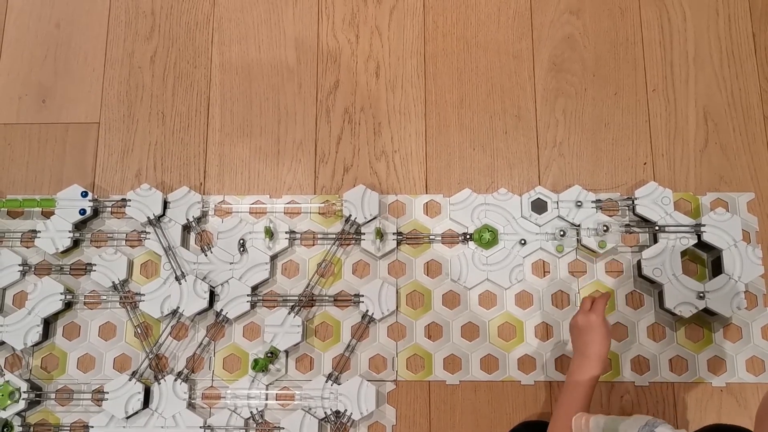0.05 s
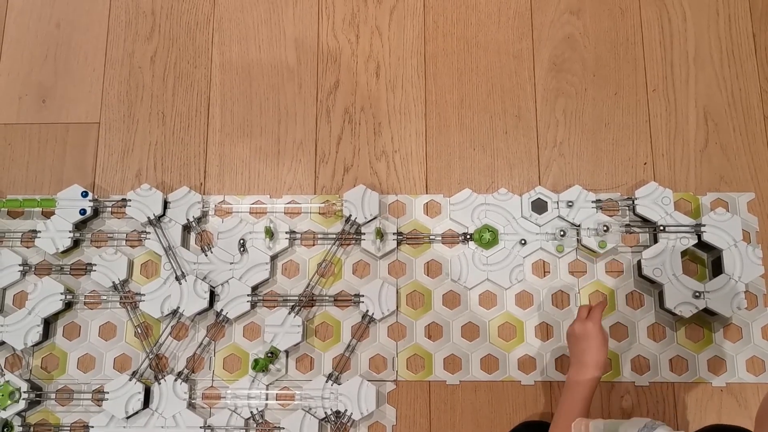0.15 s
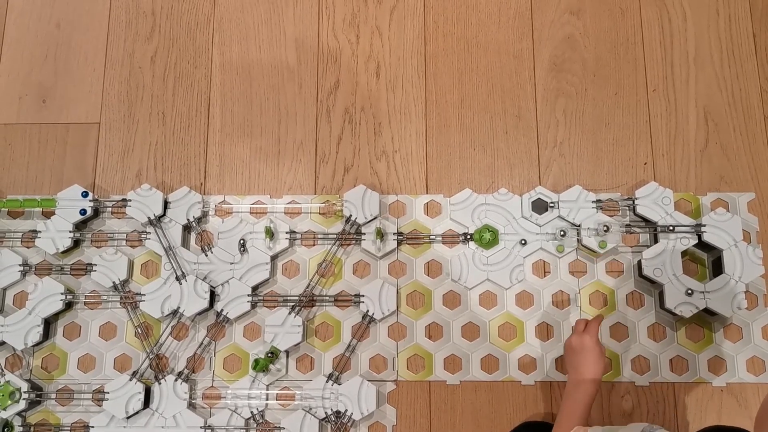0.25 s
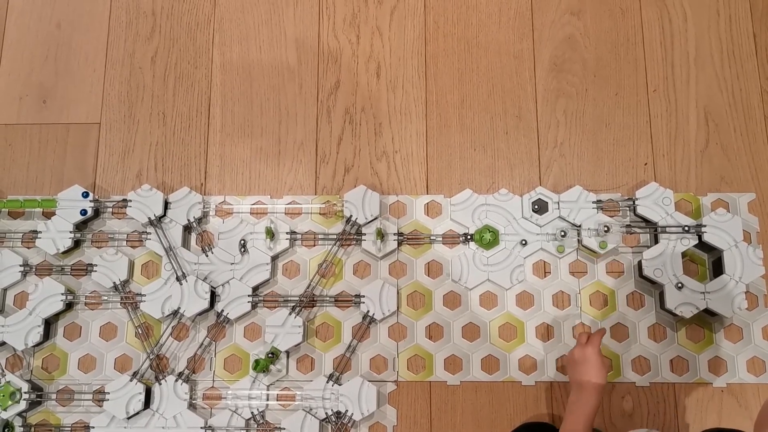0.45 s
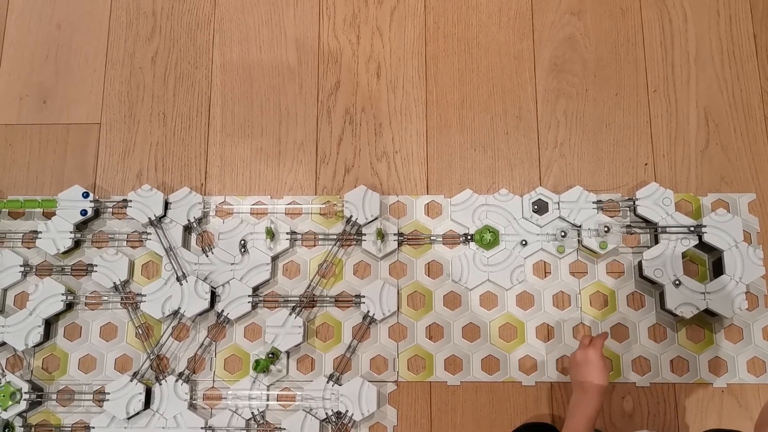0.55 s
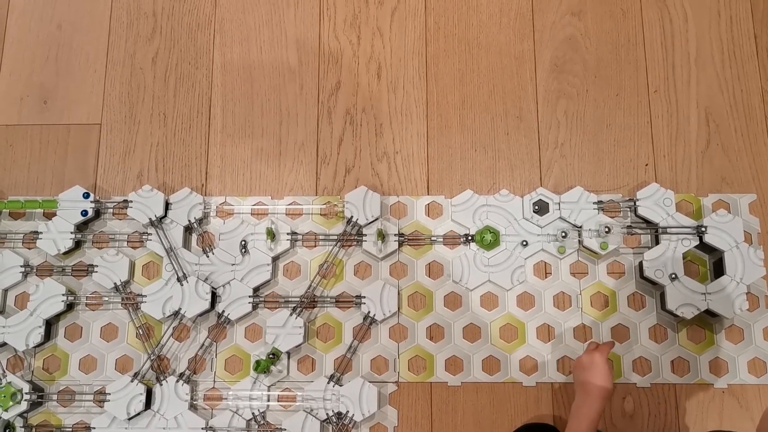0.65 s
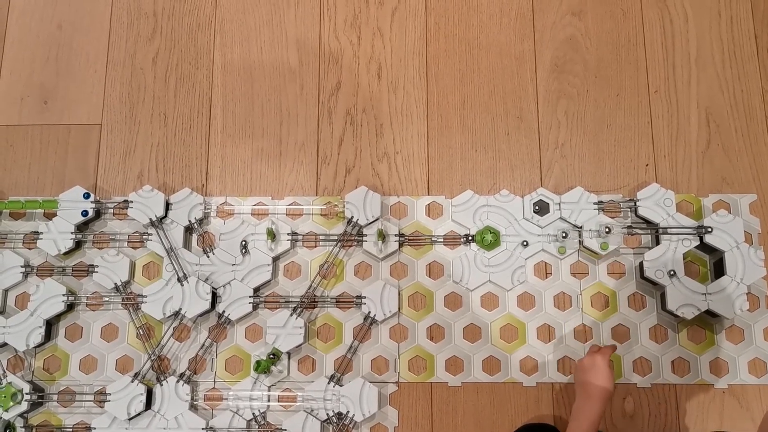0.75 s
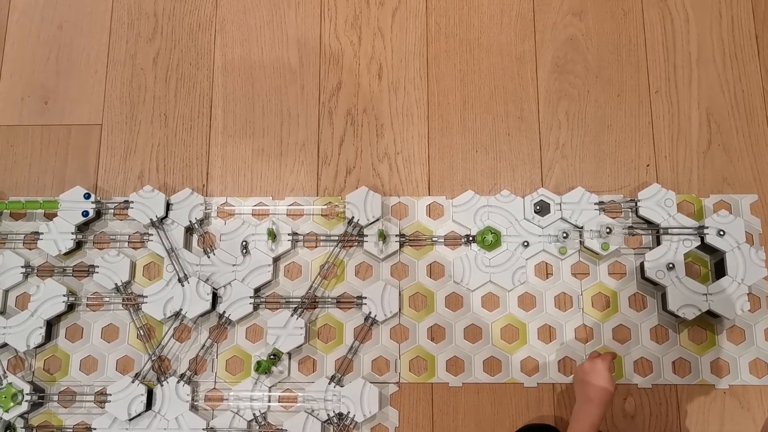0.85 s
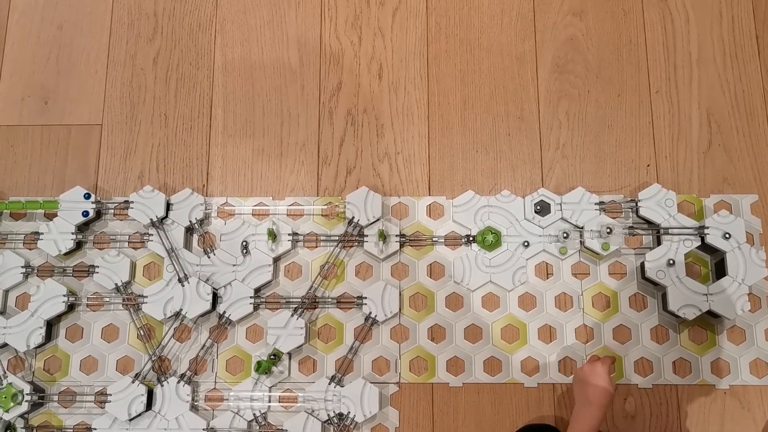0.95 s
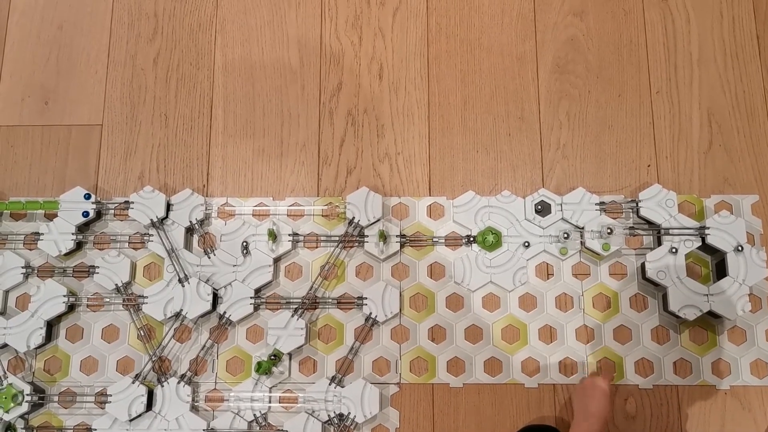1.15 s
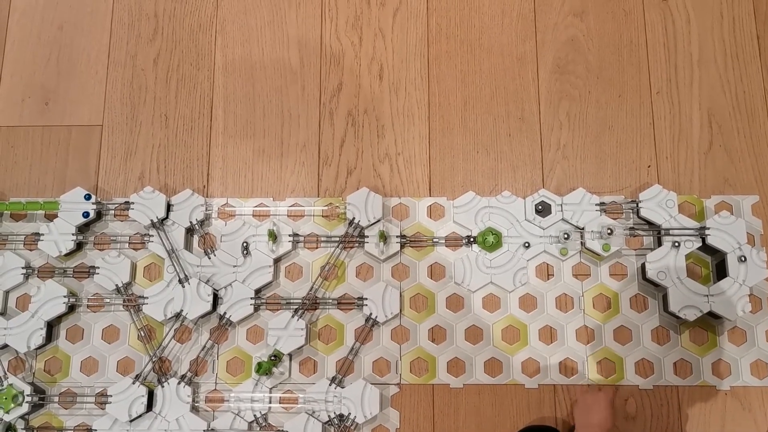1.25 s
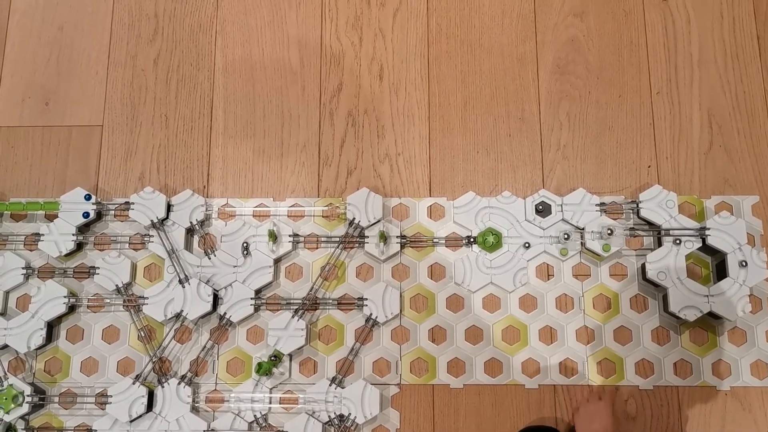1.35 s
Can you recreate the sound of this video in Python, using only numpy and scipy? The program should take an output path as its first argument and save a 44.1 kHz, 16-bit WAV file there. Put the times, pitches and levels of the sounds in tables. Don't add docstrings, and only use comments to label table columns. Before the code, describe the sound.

Marbles knock on hollow plastic track tiles: light ticks, a quick clatter, one loud clack with a few follow-ups, then the bare room's ring dies away over low hum, ending in a faint rattle.

```python
import sys
import numpy as np
from scipy import signal
from scipy.fft import rfft, irfft, next_fast_len
from scipy.io import wavfile

SR = 44100
rng = np.random.default_rng(int(sys.argv[2]) if len(sys.argv) > 2 else 0)


def boost_factor(decibels):
    exponent = np.asarray(decibels, float) / 20
    return 10 ** exponent


def store_wav(level_fs):
    pcm = np.round(np.clip(np.atleast_2d(level_fs), -1, 1) * 32767)
    wavfile.write(sys.argv[1], SR, pcm.T.astype(np.int16))


N = 61739

# f/Hz, level per Hz/dB
HUM_COLOUR = [(20, 13), (45, -3), (85, -6.5), (200, -6), (500, -17.5), (1500, -16), (4000, -46),
              (9000, -47)]
# f/Hz, likeness (1 = same)
HUM_LIKENESS = [(25, 0.1), (150, 0.85), (500, 0.1)]
# t/s, hollow level/dB, plate f/Hz,
# plate level/dB, click level/dB
CONTACTS = [(-.12, -46.5, 1970, -36.5, -49), (0.0395, -40.5, 2994, -41.5, -60),
            (0.0923, -42.5, 1478, -37, -52.5), (0.097, -41, 1066, -35.5, -57),
            (.201, -57.5, 1150, -37.5, -94), (.2192, -43, 1285, -39.5, -52),
            (0.2219, -33.5, 1526, -46.5, -48.5), (0.2246, -27, 815, -32.5, -40.5),
            (0.2362, -30.5, 2037, -31.5, -61.5), (.4642, -60, 950, -47, -80),
            (0.4667, -15.5, 991, -24, -39), (0.4687, -20.5, 501, -26.5, -34.5),
            (0.4719, -22.5, 1165, -30, -76), (0.523, -37.5, 5526, -36, -52.5),
            (.6203, -24.5, 649.5, -28, -51.5), (.6715, -43.5, 764, -35, -101),
            (0.8111, -35.5, 1172, -30, -52.5), (.816, -32.5, 486, -38.5, -56),
            (1.154, -78, 1020, -57.5, -77), (1.3008, -75, 1661, -39.5, -63),
            (1.3062, -71, 2925, -45.5, -63), (1.3159, -65, 1486, -37.5, -69),
            (1.3198, -60.5, 5900, -62, -59), (1.326, -61.5, 680, -39, -55), (1.369, -47, 600, -54, -83)]
# f/Hz, level/dB, time to fall 60 dB/s
TILE_HOLLOW = [(2023, 4, 0.0097), (2317, -13.5, .015), (2249, 5.5, 0.01), (2428, 3, 0.014),
               (2940, -1.5, 0.0067)]
# ratio to the plate pitch, level/dB
TILE_PLATE = [(0.799, -9), (1.002, 2.5), (1.198, -3), (1.45, -3.5)]
# f/Hz, level/dB, time to fall 60 dB/s
STEEL_MARBLE = [(3300, 4, 0.025), (3776, 8.5, 0.017), (4904, 4.5, 0.01), (5900, 2.5, 0.018),
                (7357, -5, 0.015), (9090, -2.5, 0.034), (14940, -25.5, .008)]
# delay t/s, level/dB, left lag t/s
CEILING_ECHOES = [
    (.0152, -5, .00007),
    (.0302, -8, .00007),
    (.046, -15, .00015),
    (.061, -18, 0.00005),
]
# f/Hz, level/dB
ECHO_TONE = [(400, -6.5), (1200, 1.5), (2400, -4), (5000, -2), (9000, -10.5), (15000, -37)]
# f/Hz, time to fall 60 dB/s
ROOM_DECAY = [(150, 1.3), (500, 1.61), (1200, 0.97), (2500, 1.108), (5000, 0.69), (8500, 0.39),
              (15000, .25)]
# f/Hz, level/dB
ROOM_TONE = [(200, -4.5), (600, 0.5), (1200, 7), (2400, -4), (4000, -1.5), (7500, 0), (15000, -20)]
# f/Hz, likeness (1 = same, -1 = opposite)
ROOM_LIKENESS = [(150, 1), (350, 0.45), (700, 0.06), (2500, -0.043), (5000, 0.021), (9000, -0.34)]
# f/Hz, left over right level/dB
LEFT_OVER_RIGHT = [(200, -.5), (700, -2.5), (2500, -3), (4500, 0), (9000, -.7)]
# from t/s, to t/s, level/dB, base plate f/Hz
JOSTLES = [
    (1.32, 1.353, -48.5, 1412),
    (1.364, 1.405, -44, 822),
]
# f/Hz, level/dB
MICROPHONE = [(20, -5.5), (7000, 1.5), (8500, -7), (9600, -33.5), (14400, -50), (15000, -16),
              (15900, -15.5), (16200, -60)]

HUM_DB = -53
PLATE_T60_S = 0.019
THUD_HZ, THUD_DB, THUD_T60_S = 421.3, -9, 0.025
CRACK_DB, CRACK_T60_S, ATTACK_S = 18, 0.013, 0.00044
SPREAD_DB, MARBLE_DETUNE = 1.5, 0.04
KNOCK_LOW_HZ = 260
CHATTER_DB, CHATTER_S = -4.5, 0.006
SEAT_DB = -39
LAG_TOP_HZ, LAG_S = 6800, 0.00008
ROOM_DB, BUILD_S = 3, 0.02
RATTLE_HOLLOW_DB, RATTLE_CLICK_DB = -7.5, -22
LEAD_S = 0.25


def along(points, hz):
    f, value = np.transpose(points)
    return np.interp(np.log(hz + 1), np.log(f + 1), value)


def filtered(x, response):
    size = next_fast_len(x.shape[-1] + SR // 4)
    spectrum = rfft(x, size) * response(np.fft.rfftfreq(size, 1 / SR))
    return irfft(spectrum, size)[..., :x.shape[-1]]


def paired(pair, alike):
    def shares(hz):
        turn = np.arccos(np.clip(along(alike, hz), -1, 1)) / 2
        return np.array([np.cos(turn), np.sin(turn)])

    mid, side = filtered(pair, shares)
    return np.array([mid + side, mid - side])


def hum():
    noise = rng.standard_normal((2, N))
    coloured = filtered(noise, lambda hz: boost_factor(along(HUM_COLOUR, hz)) * (hz > 15))
    pair = paired(coloured, HUM_LIKENESS)
    return boost_factor(HUM_DB) * pair / pair.std()


def ring(modes, t, spread_db):
    hz, db, t60 = np.transpose(modes)[:, :, None]
    level = boost_factor(db + spread_db[:len(modes), None] - 60 * t / t60)
    return (level * np.sin(2 * np.pi * hz * t)).sum(0)


def crack(t):
    noise = rng.standard_normal(len(t)) * boost_factor(CRACK_DB - 60 * t / CRACK_T60_S)
    return filtered(noise, lambda f: (1j * f / (500 + 1j * f)) ** 2 / (1 + 1j * f / 3000))


def knock(hollow_db, plate_hz, plate_db, click_db):
    t = np.arange(SR // 10) / SR
    spread = rng.standard_normal((4, 8))
    plate_modes = [(ratio * plate_hz, db, PLATE_T60_S) for ratio, db in TILE_PLATE]
    plate_modes.append((THUD_HZ, THUD_DB, THUD_T60_S))
    marble_modes = []
    for (hz, db, t60), u in zip(STEEL_MARBLE, spread[3]):
        marble_modes.append((hz * (1 + MARBLE_DETUNE * np.tanh(u)), db, t60))
    hollow = ring(TILE_HOLLOW, t, SPREAD_DB * spread[0])
    plate = ring(plate_modes, t, SPREAD_DB * spread[1])
    marble = ring(marble_modes, t, SPREAD_DB * spread[2])
    click = marble + crack(t)
    sound = boost_factor(hollow_db) * hollow + boost_factor(plate_db) * plate + boost_factor(click_db) * click
    sound = sound * (1 - np.exp(-t / ATTACK_S))
    return filtered(sound, lambda f: (1j * f / (KNOCK_LOW_HZ + 1j * f)) ** 2)


def chatter(sound, blow_db, count=4):
    when, size = rng.uniform(0, 1, (2, count))
    at = (SR * CHATTER_S * (np.arange(count) + when) / count).astype(int) + 20
    skips = np.zeros(SR // 20)
    skips[0] = 1
    skips[at] = boost_factor(CHATTER_DB - 3.96 * size - max(blow_db - SEAT_DB, 0))
    return signal.fftconvolve(sound, skips)


def paths(hz):
    side = np.array([[.5], [-.5]]) / (1 + (hz / LAG_TOP_HZ) ** 4)

    def arrive(delay_s, db, lag_s):
        late = delay_s + abs(lag_s) + side * lag_s
        return boost_factor(db) * np.exp(-2j * np.pi * hz * late)

    echoes = sum(arrive(*echo) for echo in CEILING_ECHOES)
    return arrive(0, 0, LAG_S) + boost_factor(along(ECHO_TONE, hz)) * echoes


def room_tail():
    hz, t, z = signal.stft(rng.standard_normal((2, SR)), SR, nperseg=256)
    decay_db = 60 * t / along(ROOM_DECAY, hz)[:, None]
    build = 1 - np.exp(-(t / BUILD_S) ** 2)
    gain = boost_factor(along(ROOM_TONE, hz)[:, None] - decay_db) * build
    gain = gain * np.sqrt(2 * np.log(1000) / SR)
    return boost_factor(ROOM_DB) * signal.istft(z * gain, SR, nperseg=256)[1]


def rattle(count=6):
    rows = []
    for start, end, db, hz in JOSTLES:
        for k, (shift, force, pitch) in enumerate(rng.uniform(-0.18, 1, (count, 3))):
            s = start + (end - start) * (k + .5 + 0.24 * shift) / count
            level = db + 3 * force
            plate_hz = hz * 1.6 ** pitch
            rows.append((s, level + RATTLE_HOLLOW_DB, plate_hz, level, level + RATTLE_CLICK_DB))
    return rows


def marbles():
    lead = round(LEAD_S * SR)
    near = np.zeros(lead + N + SR)
    room = np.zeros((2, lead + N + 2 * SR))
    for s, *levels in CONTACTS + rattle():
        sound = chatter(knock(*levels), levels[0])
        at = lead + round(s * SR)
        near[at:at + len(sound)] += sound
        tail = signal.fftconvolve(sound[None], room_tail(), axes=1)
        room[:, at:at + tail.shape[1]] += tail
    heard = filtered(near, paths) + paired(room[:, :len(near)], ROOM_LIKENESS)
    balanced = filtered(heard, lambda hz: boost_factor(along(LEFT_OVER_RIGHT, hz) * [[.5], [-.5]]))
    return balanced[:, lead:lead + N]


def scene():
    return marbles() + hum()


def roll_off(x):
    return signal.sosfilt(signal.butter(12, 16200, fs=SR, output="sos"), x)


def record(dry):
    mix = filtered(dry, lambda hz: boost_factor(along(MICROPHONE, hz)))
    return roll_off(mix)


dry = scene()
out = record(dry)
store_wav(out)
```